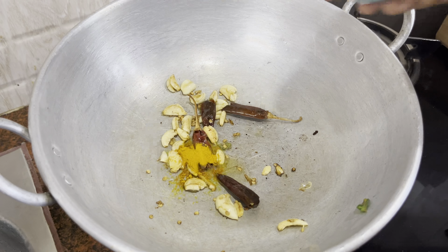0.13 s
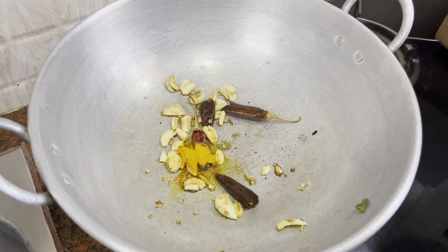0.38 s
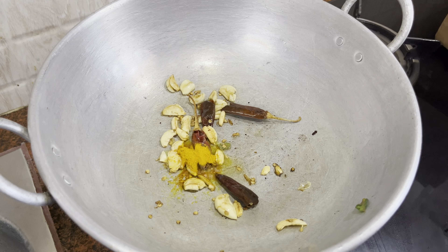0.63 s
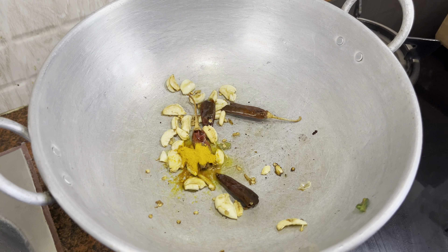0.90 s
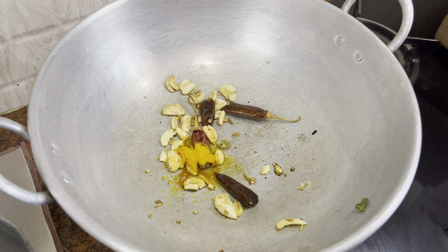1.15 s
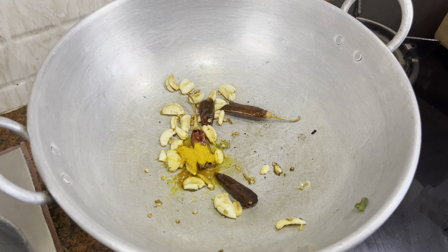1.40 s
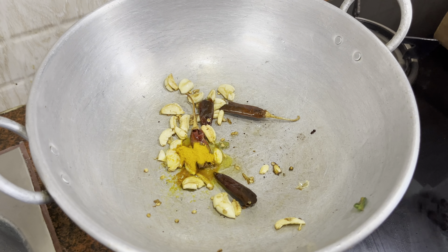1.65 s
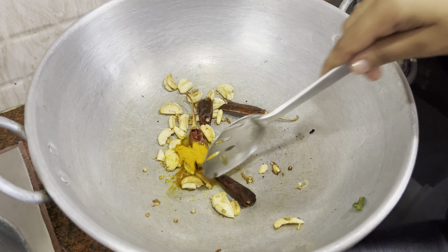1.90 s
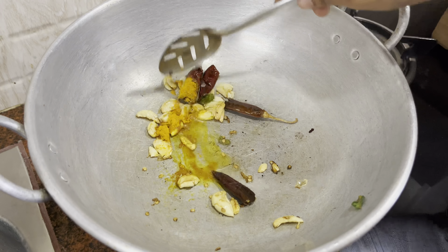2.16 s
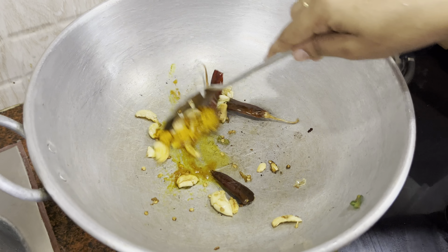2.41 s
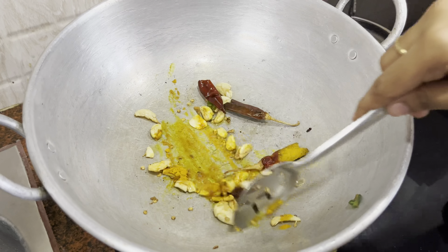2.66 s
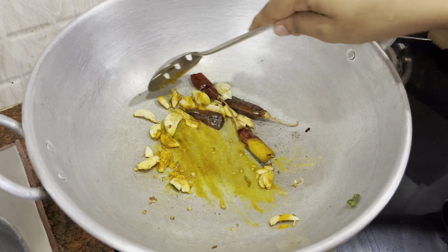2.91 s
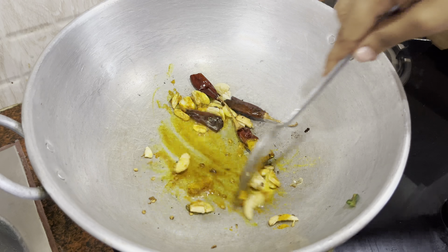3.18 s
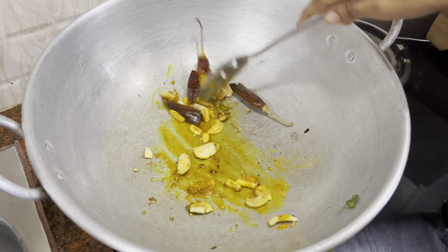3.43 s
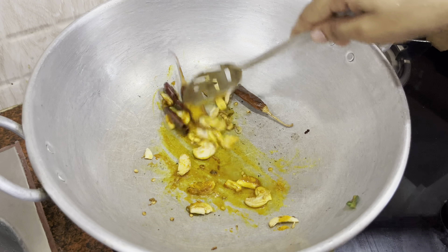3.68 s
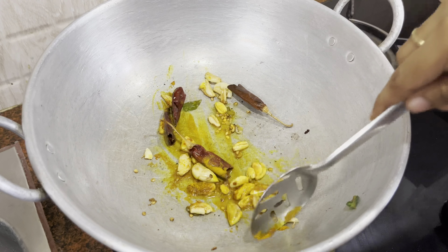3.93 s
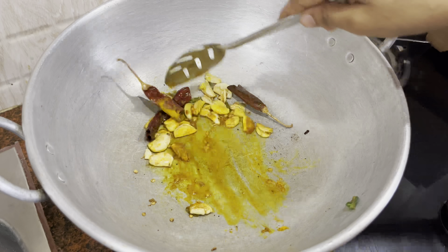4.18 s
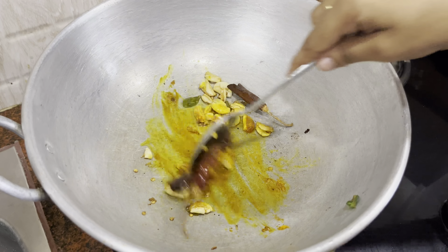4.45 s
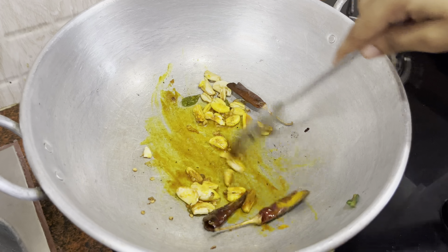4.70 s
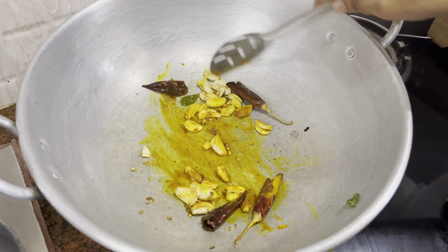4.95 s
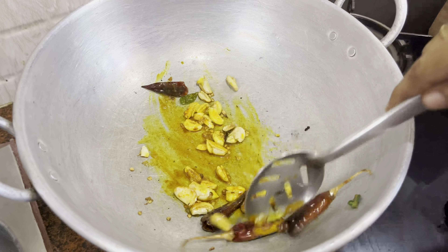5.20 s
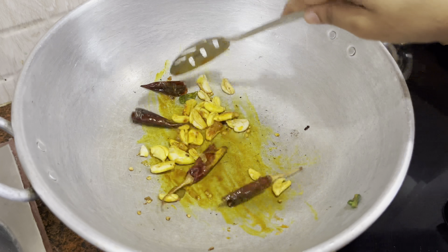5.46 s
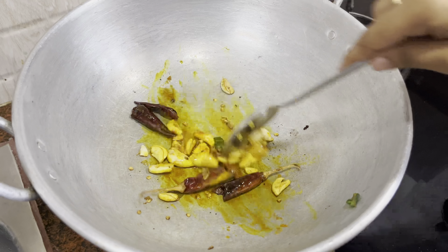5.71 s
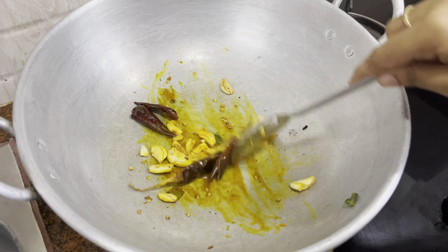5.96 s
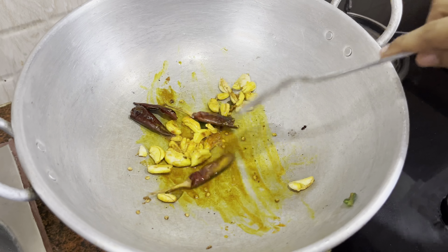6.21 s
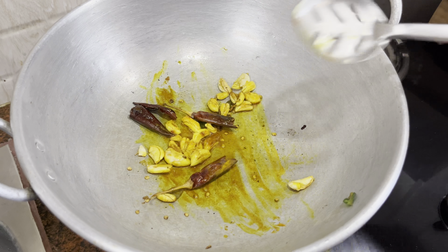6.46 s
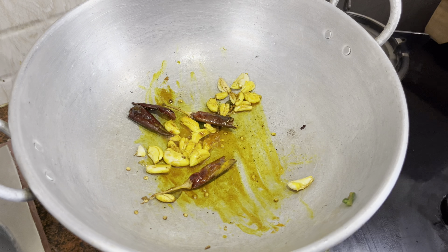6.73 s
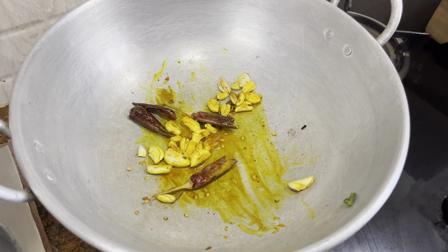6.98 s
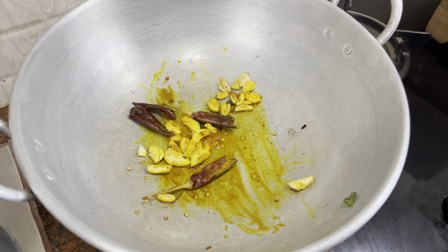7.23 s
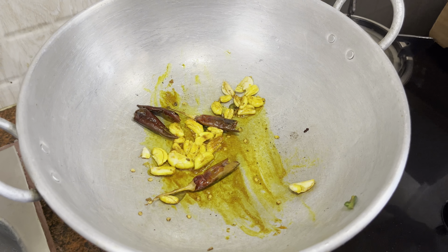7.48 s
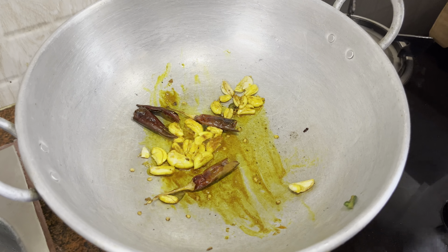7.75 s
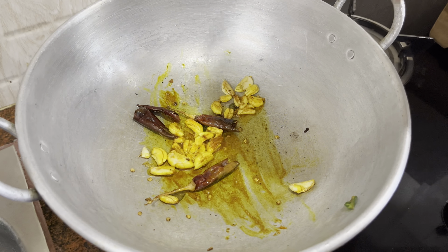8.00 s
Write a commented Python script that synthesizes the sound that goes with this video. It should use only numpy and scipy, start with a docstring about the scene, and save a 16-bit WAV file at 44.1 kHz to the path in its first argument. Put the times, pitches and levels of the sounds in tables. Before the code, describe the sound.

Faint, steady oil hiss lies over a soft low mains hum, slight rumble and a barely audible fan tone. A tiny tick comes at 0.6 seconds, then dull, roomy knocks off to the side around 1.3. At 2.0 the spoon lightly touches the pan wall, and from 2.3 to 5.7 it stirs: hollow, falling thuds with short low pan ringing and small high clinks, each with a gritty steel scrape, loudest near 2.7, 4.9 and 5.55. Nuts tick brightly, notably at 3.5, 4.2 and 4.5, and faint thin squeaks appear. A last soft scrape fades near 6.0, with a few ticks to 6.9. At 7.0 the spoon lands on the counter with a clear ringing clink. Dull side knocks at 7.3 are chopped off by a cut near 7.4, leaving quieter hiss, weaker hum and a faint squeak at 7.9. Close stereo, short room tail.

```python
"""A slotted steel spoon knocks and scrapes in a thin round metal pan, stirring nuts in a little hot oil.
Knocks are short falling thuds with ringing pan modes; scrapes are uneven noise through the same modes.
Nuts tick, faint tones squeak, dull knocks sound off to the side; the spoon is set down before the last of them.
Shaped noise makes oil hiss and rumble under a mains hum and a fan tone; a splice cuts one knock short.
A phone with two microphone ports listens."""
import sys
import numpy as np
from scipy import signal
from scipy.fft import rfft, irfft, next_fast_len
from scipy.io import wavfile
from scipy.ndimage import uniform_filter1d, map_coordinates

SR = 44100
rng = np.random.default_rng(int(sys.argv[2]) if len(sys.argv) > 2 else 0)


def elevation(decibels):
    """Turn decibel levels (scalar or array-like) into linear amplitude ratios."""
    levels = np.asarray(decibels, float)
    return 10 ** (levels / 20)


def dump_mix(stems):
    """Bounce the given channels to the path in sys.argv[1] as a 16-bit WAV at rate SR."""
    frames = np.atleast_2d(stems).T  # one column per channel
    limited = np.clip(frames, -1, 1)  # hard clip at full scale
    pcm = np.round(limited * 32767).astype(np.int16)
    wavfile.write(sys.argv[1], SR, pcm)


N = 358091
T = np.arange(SR // 2) / SR  # time within one event, s

# Low pan modes. Each row: frequency in Hz, level in dB, t60 in seconds.
PAN_MODES = [(123, -16, 0.058), (175.5, -9.5, 0.12), (236, -7, 0.12), (260.7, -3, 0.3), (313, -9, 0.18),
             (399, -8.5, 0.25), (493, 1.5, 0.26), (567, 0.5, 0.05), (640, -4, 0.11), (700, -2.5, 0.076),
             (735, -18, 0.13), (821, -18.5, 0.035), (1028, -17.5, 0.05), (1099, -2.5, 0.062),
             (1124.5, -5, 0.11), (1333, 1, 0.07), (1430, -4, 0.066), (1537, -4, 0.019)]
# High pan modes. Each row: frequency in Hz, level in dB, t60 in seconds.
RIM_MODES = [(2970, -0.5, 0.098), (3460, 2.5, 0.08), (3570, -14, 0.15), (3850, -4.5, 0.32),
             (4043, -6.5, 0.36), (4080, -0.5, 0.29), (4473, -1.5, 0.24), (4700, -6.5, 0.066),
             (5160, 0, 0.096), (5260, -0.5, 0.078), (5480, 1, 0.1), (5520, -7, 0.13), (5850, -2.5, 0.05),
             (6280, -2.5, 0.26), (6730, 0.5, 0.11), (9800, -16, 0.038), (10900, -8, 0.064)]
# Modes rung when the spoon is laid down: the first two rows (426 Hz, 700 Hz) sound in the counter, the rest in
# the spoon. Each row: frequency in Hz, level in dB, t60 in seconds.
SPOON_MODES = [(426, -3.5, 0.12), (700, -7.5, 0.073), (1823, -2.5, 0.15), (2160, 1, 0.15),
               (2180, 1.5, 0.089), (2290, 2.5, 0.054), (2687, 2.5, 0.11), (2910, -11.5, 0.135),
               (3780, -10, 0.2), (4420, -4.5, 0.15), (4470, -4.5, 0.094), (4970, -8, 0.07),
               (5350, -10, 0.092), (6170, -29, 0.04), (6800, -27, 0.03)]
# Spectrum of steel rubbing on metal. Each row: frequency in Hz, relative density in dB per Hz.
RUB_SPECTRUM = [(1700, -8), (2300, -6.5), (3000, -2), (4000, -1), (5200, -2), (6500, -2.5), (8000, -4),
                (10000, -7), (12000, -11), (14000, -10), (15800, -18)]
KNOCK_DELAY_S = .0025  # from the listed time to the start of the knock sound


def unit(x):
    """Scales to rms 1."""
    return x / np.sqrt(np.mean(x ** 2) + 1e-20)


def along(points, hz):
    """Interpolates (Hz, value) points on a log axis."""
    f, v = np.transpose(points)
    return np.interp(np.log(hz + 1), np.log(f + 1), v)


def curves(rows):
    """Returns one value per sample for each column after the time."""
    s, *cols = np.transpose(rows)
    return [np.interp(np.arange(N) / SR, s, c) for c in cols]


def wobble(knots_per_s):
    """Draws a smooth random curve."""
    knots = rng.standard_normal(int(N * knots_per_s / SR) + 4)
    return map_coordinates(knots, [np.arange(N) * knots_per_s / SR])


def filtered(x, response):
    """Applies a complex response of frequency in Hz."""
    m = next_fast_len(x.shape[-1] + SR // 2)
    spectrum = rfft(x, m) * response(np.fft.rfftfreq(m, 1 / SR))
    return irfft(spectrum, m)[..., :x.shape[-1]]


def add(track, s, sound):
    """Mixes a sound in at time s."""
    part = track[:, round(s * SR):][:, :sound.shape[1]]
    part += sound[:, :part.shape[1]]


def burst(t60_s):
    """Two unrelated puffs of decaying noise."""
    return rng.standard_normal((2, len(T))) * elevation(-60 * T / t60_s)


def ring(modes, spread_db, tilt=lambda hz: 0):
    """Two unrelated strikes of decaying, beating modes; tilt is the dB with which the blow reaches each."""
    hz, db, t60 = np.transpose(modes)[:, :, None]
    size = elevation(db + tilt(hz) + spread_db * rng.standard_normal((2, len(hz), 1)))
    phase, beat_phase, beat = rng.random((3, 2, len(hz), 1))
    t = T[:len(T) * 2 // 3]
    waves = np.sin(2 * np.pi * (hz * t + phase)) * elevation(-60 * t / np.clip(t60, .02, .5))
    beat_hz = 12 + 35 * beat
    waves *= 1 + 0.7 * np.sin(2 * np.pi * (beat_hz * t + beat_phase))
    sound = (size * waves).sum(1) / np.sqrt((size ** 2).sum(1).mean())
    sound *= 1 - np.exp(-t / 0.00016)  # soft onset
    return np.pad(sound, [(0, 0), (0, len(T) - len(t))])


def modal(modes, damping):
    """Causal resonances of alternating sign, widened by the touch of the spoon."""
    def response(f):
        total = 0
        for k, (hz, db, t60) in enumerate(modes):
            width = damping / t60
            total = total + (-1) ** k * elevation(db) * 1j * f * width / (hz * hz - f * f + 1j * f * width)
        return total
    return response


def room(x, wet_db):
    """Adds a fresh diffuse noise tail 4 ms late; each frequency dies at its own speed."""
    # Each row: frequency in Hz, t60 in seconds.
    decay = [(150, 0.34), (500, 0.36), (2000, 0.47), (6000, 0.23), (14000, 0.32)]
    hz, t, z = signal.stft(rng.standard_normal((2, len(T))), SR, nperseg=256)
    z = z * elevation(-60 * t / along(decay, hz)[:, None])
    tail = signal.istft(z, SR, nperseg=256)[1][:, :len(T)]
    tail = np.pad(tail / np.linalg.norm(tail[0]), [(0, 0), (round(.004 * SR), 0)])
    wet = signal.fftconvolve(x.sum(0)[None], tail, axes=1)[:, :x.shape[1]]
    return x + elevation(wet_db) * wet


def patchy(x, patchy_db):
    """Gives noise random loud and soft patches, a few hundred Hz wide and some ms long; rms 1."""
    z = signal.stft(x, nperseg=256)[2]
    field = uniform_filter1d(rng.standard_normal(z.shape[1:]), size=4, axis=0)
    field = uniform_filter1d(field, size=5, axis=1)
    return unit(signal.istft(z * elevation(patchy_db * unit(field)), nperseg=256)[1][:, :N])


def kitchen():
    """Oil hiss over room air and a low rumble, both shaped noise; a wavering mains hum and a thin fan tone."""
    # Rumble, room air and oil hiss. Each row: frequency in Hz, relative density in dB per Hz.
    air = [(30, 5.5), (80, -1), (130, 4.5), (200, -10), (300, -12.5), (600, -13), (1200, -16), (2000, -14),
           (3000, -11.5), (4500, -12.5), (6500, -13.5), (8500, -13.5), (11000, -14), (14000, -16),
           (15800, -17.5)]
    # Before and after the splice. Each row: time in seconds, hiss, mean hum and mean rumble level in dB.
    floor = [
        [(0, -47.5, -44.5, -54), (2, -47.5, -48, -53), (4, -45.5, -45, -56.5), (5, -44.5, -49, -50.5),
         (6.5, -47.5, -45.5, -54.5), (7.38, -47, -46, -51)],
        [(7.39, -50.5, -53, -54), (7.6, -49.5, -47, -55), (7.75, -49, -62, -53.5), (8.12, -48.5, -67.5, -47.5)],
    ]
    hiss_db, hum_db, rumble_db = curves(floor[0] + floor[1])
    t = np.arange(N) / SR

    fizz = elevation(0.82 * wobble(400) + 0.85 * wobble(5.4)) * rng.standard_normal((2, N))
    hiss = elevation(hiss_db) * unit(filtered(fizz, lambda f: elevation(along(air[3:], f)) * (f > 150)))

    low_air = air[:4] + [(280, -58.5)]
    low_noise = unit(filtered(rng.standard_normal(N), lambda f: elevation(along(low_air, f))))
    rumble = elevation(rumble_db + 2.04 * wobble(7.1)) * low_noise

    hum = elevation(hum_db + 0.93 * wobble(5)) * np.sin(2 * np.pi * 49 * t + .5 * wobble(2.7))
    fan = elevation(-62.5 + 2.0 * wobble(3.6)) * np.sin(2 * np.pi * 239 * t + 1.15 * wobble(8))
    return hiss + (rumble + hum + fan) * [[1], [0]]


def squeaks():
    """Short thin gliding tones with a randomly drifting phase."""
    # Each row: start in seconds, length in seconds, start Hz, end Hz, level in dB.
    tones = [(2.85, .09, 2150, 2130, -51), (3.43, .06, 2250, 2050, -50), (4.72, .09, 2200, 2200, -49),
             (7.86, .16, 2470, 2430, -51)]
    out = np.zeros((2, N))
    for s, length_s, start_hz, end_hz, db in tones:
        u = np.clip(T / length_s, 0, 1)
        phase = 2 * np.pi * np.cumsum(start_hz + (end_hz - start_hz) * u) / SR
        blur = np.cumsum(.11 * rng.standard_normal((2, len(T))), axis=1)
        add(out, s, elevation(db) * np.sin(np.pi * u) * np.sin(phase + blur))
    return out


def counter():
    """The spoon rings freely where it is laid down; dull knocks sound off to the side, mostly through the room."""
    # Spoon meets the counter. Each row: start in seconds, level in dB.
    landings = [(6.986, -26.5), (6.99, -19.5)]
    # Dull knocks. Each row: start in seconds, peak before the room in dB, pitch in Hz.
    dull_knocks = [(1.26, -40, 600), (1.349, -26.5, 760), (1.419, -36.5, 600), (7.325, -26, 1140),
                   (7.35, -31.5, 986)]
    # Counter resonances. Each row: frequency in Hz, width in Hz, level in dB.
    slab_modes = [(419, 23, 0), (700, 50, -0.5), (1165, 42, -4), (1690, 63, -2), (2290, 64, -13),
                  (3410, 37, 0)]

    def slab(f):
        return sum((-1) ** k * elevation(g) * 1j * f * w / (c * c - f * f + 1j * f * w)
                   for k, (c, w, g) in enumerate(slab_modes))

    out = np.zeros((2, N))
    for s, db in landings:
        contact = 0.54 * filtered(burst(0.041), lambda f: f < 7500)
        add(out, s, elevation(db) * room(ring(SPOON_MODES, spread_db=0.5) + contact, wet_db=-4))
    for s, db, hz in dull_knocks:
        dull = lambda f: elevation(-3.5 * np.log2((f + 1) / hz) ** 2) / (1 + (f / 3300) ** 6)
        knock = filtered(burst(0.059), lambda f: (0.22 + slab(f)) * dull(f))
        add(out, s, elevation(db) * room(knock / np.abs(knock).max(), wet_db=-2.0))
    return out


def ticks():
    """Nuts snap against steel: tiny hard contacts, a bright crack with a short hissing tail."""
    # Each row: start in seconds, level in dB, lowest pitch in Hz.
    snaps = [(.635, -28, 8000), (2.1076, -34.5, 5500), (2.422, -22.5, 3000), (2.6234, -34.5, 9000),
             (3.4146, -30.5, 7500), (3.475, -16, 4730), (3.5234, -25.5, 5000), (4.2266, -15, 5150),
             (4.4593, -16.5, 4500), (5.0998, -22, 5000), (5.1457, -19.5, 8000), (5.9375, -31.5, 3500),
             (6.106, -31, 4000), (6.8204, -30, 7000), (6.8763, -33.5, 6000)]
    out = np.zeros((2, N))
    for s, db, low_hz in snaps:
        bright = lambda f: 1 / (1 + (low_hz / (f + 1)) ** 8) / (1 + f / 9000)
        add(out, s, elevation(db) * filtered(burst(0.0053) + 0.47 * burst(0.093), bright))
    return out


def strokes():
    """Gains of scrape and rumble: every stroke rises, holds, falls and trails off; their powers add."""
    # Each row: full speed at seconds, rise in seconds, hold in seconds, scrape in dB, rumble re scrape in dB.
    drags = [(2.004, 0.053, 0.0034, -38, -9), (2.29, 0.022, 0.023, -42, -16),
             (2.342, 0.019, 0.0028, -31, -3.5), (2.422, 0.034, 0.016, -41.5, -0.5),
             (2.674, 0.036, 0.079, -40, -9), (3.046, 0.14, 0.021, -34.5, -5),
             (3.303, 0.025, 0.011, -38.5, -4), (3.445, 0.21, 0.13, -51, -10),
             (3.689, 0.089, 0.042, -45.5, -1), (4.035, .1, 0.012, -39, -8.5),
             (4.318, 0.039, 0.065, -35.5, -9.5), (4.52, 0.14, .02, -49.5, -2.5),
             (4.657, 0.046, .015, -41.5, -13), (4.953, 0.045, 0.045, -30, -5),
             (5.095, .05, 0.014, -44.5, -9), (5.283, .08, .08, -44, -7.5), (5.578, 0.018, 0.018, -41, 5),
             (5.616, 0.049, 0.018, -39, -2), (5.956, 0.096, 0.047, -47.5, -7.5)]
    rise_db, fall_db_per_s = 20, 187
    # a slower, duller trail after each stroke, like the room dying away
    trail_db, trail_db_per_s, trail_rumble_db = -12, 59, 3
    s, rise_s, hold_s, db, rumble_db = np.transpose(drags)[:, :, None]
    t = np.arange(0, N + 64, 64) / SR
    early_s = np.clip(s - t, 0, None)
    late_s = np.clip(t - s - hold_s, 0, None)
    front_db = db - rise_db * early_s / rise_s
    drag = elevation(front_db - fall_db_per_s * late_s) ** 2
    trail = elevation(front_db + trail_db - trail_db_per_s * late_s) ** 2
    low = elevation(rumble_db) ** 2 * (drag + elevation(trail_rumble_db) ** 2 * trail)
    return [np.interp(np.arange(N) / SR, t, np.sqrt(power.sum(0))) for power in (drag + trail, low)]


def scrape():
    """The spoon's edge skips over rough metal: uneven grit drives a rasp, the high modes and the low modes."""
    drag, low = strokes()

    def grit(lumpy_db):
        return patchy(elevation(lumpy_db * wobble(260)) * rng.standard_normal((2, N)), patchy_db=2.5)

    def played(drive, response):
        rms_gain = np.sqrt(np.mean(np.abs(response(np.linspace(1, SR / 2, 8192))) ** 2))
        return filtered(drive, response) / rms_gain

    rub = [(600, -16.5)] + RUB_SPECTRUM
    low_modes = modal(PAN_MODES, damping=2.5)
    rasp = played(elevation(3.5) * drag * grit(2.47), lambda f: elevation(along(rub, f)))
    sing = played(elevation(-4.5) * drag * grit(1.5), modal(RIM_MODES + SPOON_MODES[6:8], damping=2.0))
    rumble = played(elevation(2.5) * low * grit(4.2), lambda f: low_modes(f) / (1 + (f / 1000) ** 2))
    return rasp + sing + rumble


def clink():
    """A short bright noise crack and the high pan modes."""
    crack = filtered(burst(0.014), lambda f: elevation(along(RUB_SPECTRUM, f)) * (f > 2500))
    return ring(RIM_MODES, 1.1) + 2.0 * crack


def glances():
    """Touches high on the wall make no thud and ring only the modes near their pitch."""
    # Each row: time in seconds, ring level in dB, clink re ring in dB.
    touches = [(1.978, -36, -19), (2.014, -26, -13.5)]
    pitch_hz, slope_db_per_octave = 1460, 39
    out = np.zeros((2, N))
    for s, db, clink_db in touches:
        body = ring(PAN_MODES, 1.7, lambda f: -slope_db_per_octave * np.abs(np.log2(f / pitch_hz)))
        add(out, s + KNOCK_DELAY_S, elevation(db) * room(body + elevation(clink_db) * clink(), wet_db=-6.5))
    return out


def knocks():
    """Each blow flexes the thin wall for a few falling cycles, then the pan rings low and clinks high."""
    # Each row: time in seconds, thud in dB, thud pitch in Hz, clink and weight re thud in dB.
    blows = [(2.281, -7.5, 635, -22, -17.5), (2.421, -14, 613, -31, -9), (2.435, -24, 640, -29, -11),
             (2.659, -4, 730, -29, -27), (2.933, -7.5, 653, -35.5, -18), (2.981, -19, 620, -32, -20),
             (3.04, -19, 620, -21, -20), (3.287, -5.5, 695, -24, -24), (3.656, -30.5, 530, -28, -17),
             (3.945, -7.5, 716, -37, -23.5), (4.289, -4.5, 700, -30.5, -17.5),
             (4.332, -18.5, 604, -19.5, -19), (4.379, -23, 624, -26, -17), (4.515, -34, 604, -25, -15.5),
             (4.638, -8.5, 700, -29, -25.5), (4.892, -1, 708, -25, -20), (4.906, -8, 735, -35, -15),
             (4.95, -15.5, 614, -25.5, -22.5), (5.004, -22, 620, -7.5, -18), (5.353, -31, 660, -28, -19),
             (5.551, -2.5, 679, -27.5, -16), (5.66, -21.5, 604, -33, -23)]
    full_ring_db, ring_lag = -16, 0.22  # ring re thud at 0 dB; dB it gains per dB a blow is lighter
    out = np.zeros((2, N))
    for s, db, hz, clink_db, weight_db in blows:
        u = T * hz - 1.6  # cycles from the crest of the thud
        swell = np.exp(-(u / np.where(u < 0, .75, 1.1)) ** 2)
        thud = swell * np.cos(2 * np.pi * (u - 0.15 * u ** 2) - .3)
        # the whole pan gives way
        push = -elevation(weight_db) * np.sin(2 * np.pi * 165 * T) * elevation(-60 * T / 0.026)
        ring_db = full_ring_db - ring_lag * db
        body = elevation(ring_db) * ring(PAN_MODES, 0.83, lambda f: -2.5 * np.log2(f / hz) ** 2)
        blow = (thud + push) * [[1], [0]] + body + elevation(clink_db) * clink()
        add(out, s + KNOCK_DELAY_S, elevation(db) * room(blow, wet_db=-7.5))
    return out


def scene():
    """Two rows: the sound that both ports share and an unrelated draw of it."""
    splice_s, fade_s = 7.383, .002
    before = np.clip((splice_s - np.arange(N) / SR) / fade_s, 0, 1)
    handling = knocks() + glances() + ticks() + scrape() + counter()
    return handling * before + squeaks() + kitchen()


def roll_off(x):
    """The treble ends steeply here."""
    return signal.sosfilt(signal.butter(12, 16490, fs=SR, output="sos"), x)


def record(dry):
    """The ports hear shared and unrelated parts, one later and louder than the other by frequency."""
    # Each row: frequency in Hz, likeness of the ports (0 to 1).
    alike = [(60, 0.67), (300, 0.87), (600, 0.35), (1400, 0.48), (1900, 0.064), (2300, 0.21), (3100, 0.57),
             (3700, 0.053), (6500, 0.12), (8000, 0.59), (9000, 0.63), (11200, 0.9), (12400, 0.79),
             (13800, 0.33), (15500, 1)]
    # Each row: frequency in Hz, phase by which left leads in radians.
    lead = [(60, 0), (300, .1), (800, .4), (1400, .3), (2100, 3.3), (3200, 2.8), (4100, 6.3), (6500, 11),
            (8000, 9.4), (11200, 6.3), (12600, 6.2), (15000, 3.2)]
    # Each row: frequency in Hz, left over right in dB.
    left = [(60, 2.5), (500, 3.5), (1300, 2), (2300, -4), (3500, 6), (5200, 10), (6600, 5), (8400, -0.5),
            (11000, -0.5)]
    top_hz, low_cut_hz = 16450, 34

    def split(hz):
        turn = np.arccos(np.clip(along(alike, hz), 0, 1)) / 2
        return np.array([np.cos(turn), np.sin(turn)])

    def port_response(hz):
        half = elevation(along(left, hz) / 2) * np.exp(.5j * along(lead, hz))  # half of the difference to each port
        return np.array([half, 1 / half]) * (hz < top_hz) * (1j * hz / (low_cut_hz + 1j * hz)) ** 4

    shared, apart = filtered(dry, split)
    ports = filtered(np.array([shared + apart, shared - apart]), port_response)
    return roll_off(ports)


dry = scene()
out = record(dry)
dump_mix(out)
```